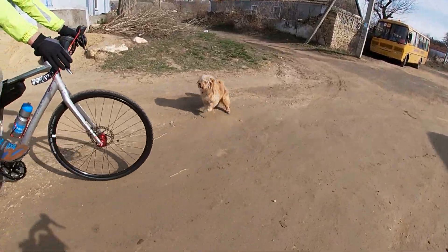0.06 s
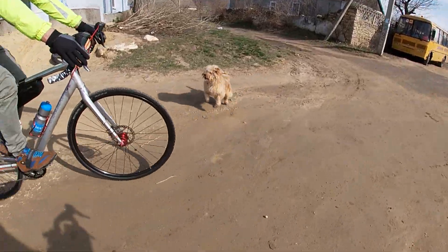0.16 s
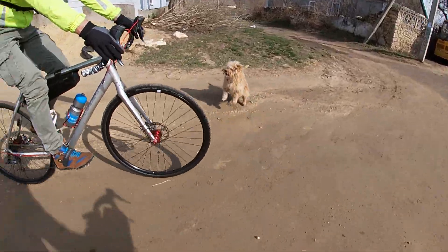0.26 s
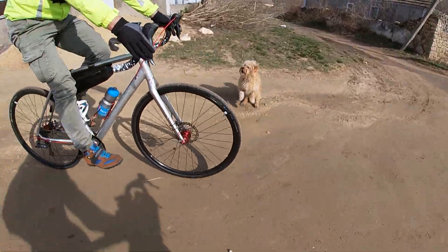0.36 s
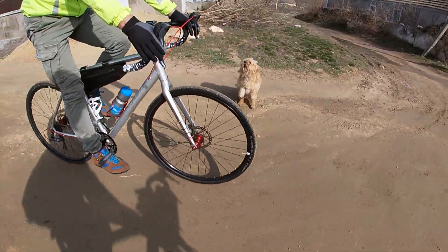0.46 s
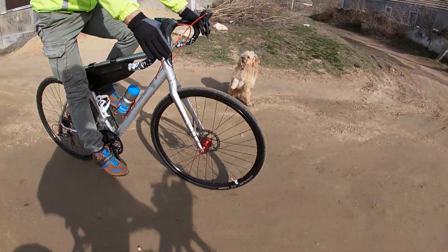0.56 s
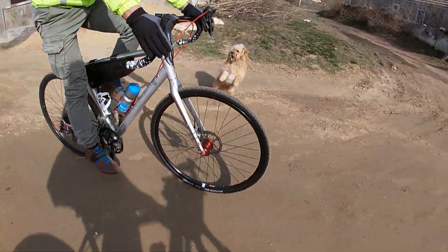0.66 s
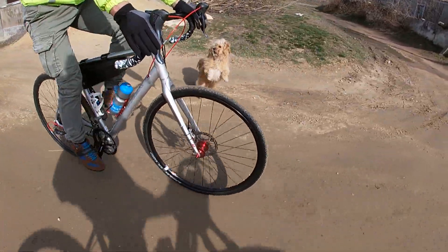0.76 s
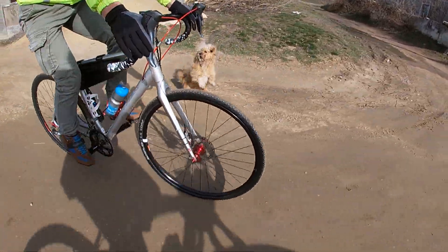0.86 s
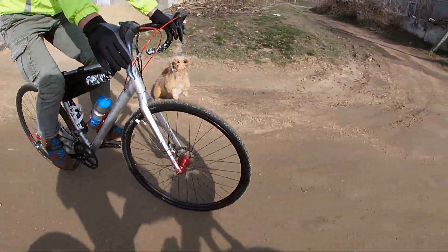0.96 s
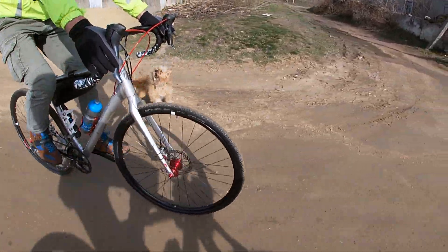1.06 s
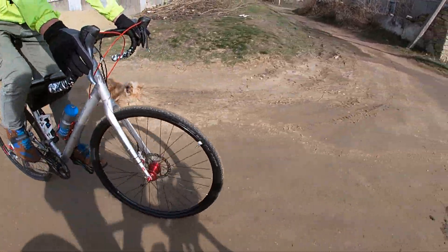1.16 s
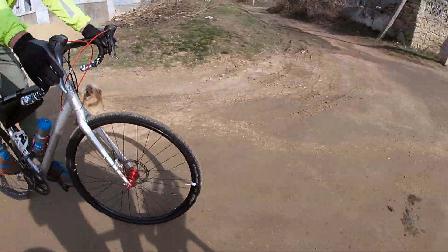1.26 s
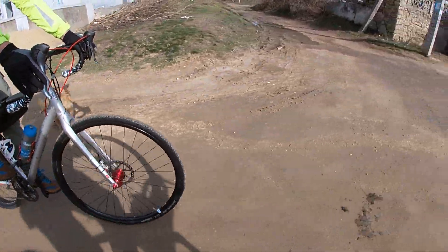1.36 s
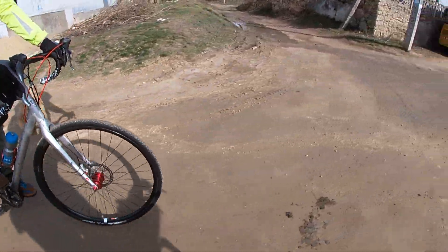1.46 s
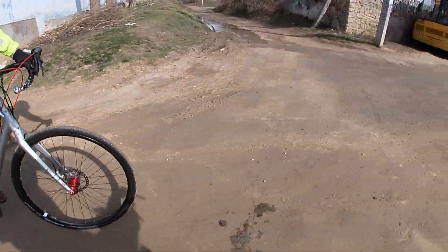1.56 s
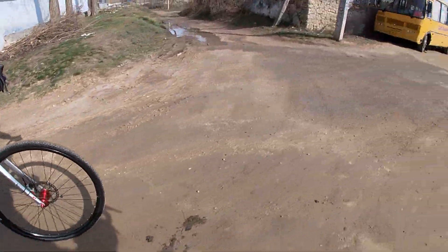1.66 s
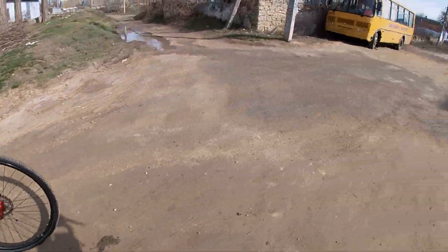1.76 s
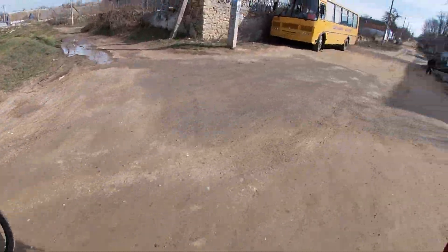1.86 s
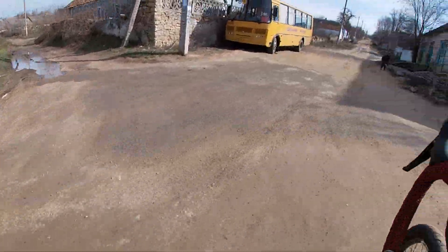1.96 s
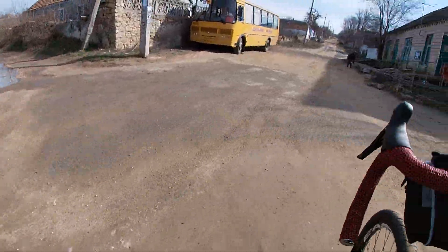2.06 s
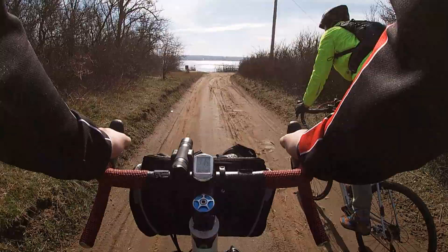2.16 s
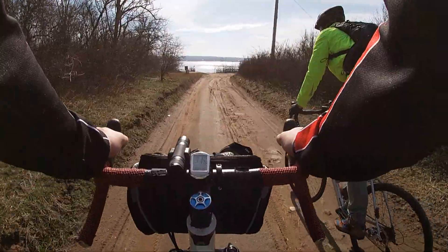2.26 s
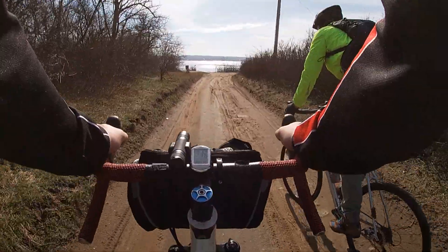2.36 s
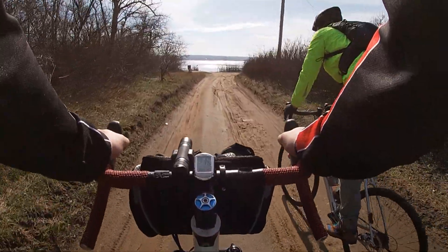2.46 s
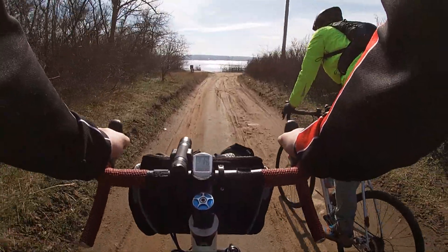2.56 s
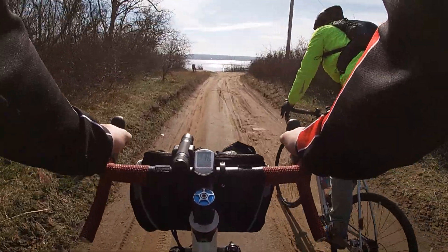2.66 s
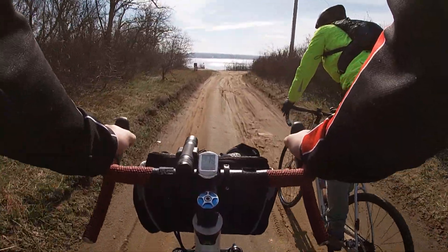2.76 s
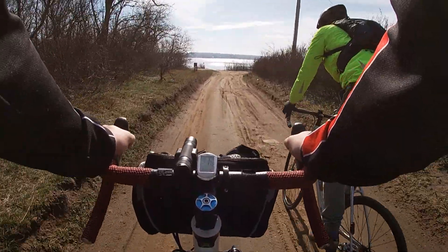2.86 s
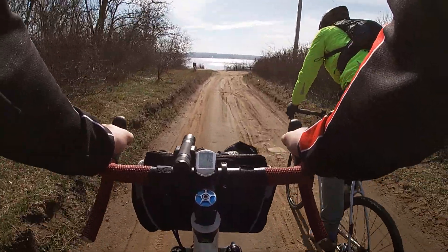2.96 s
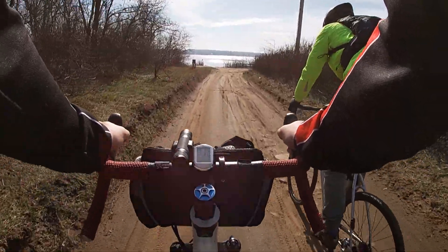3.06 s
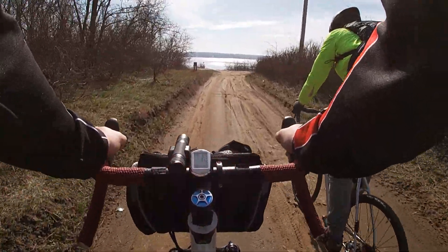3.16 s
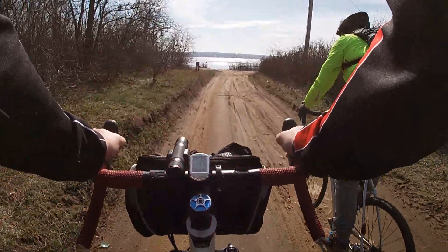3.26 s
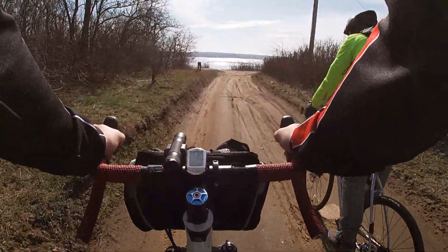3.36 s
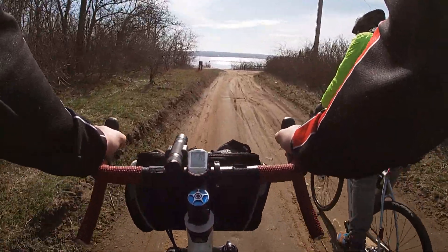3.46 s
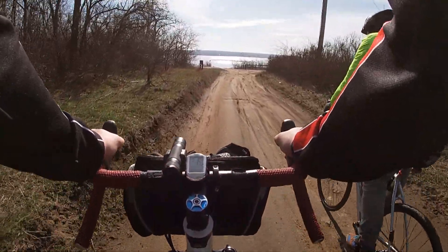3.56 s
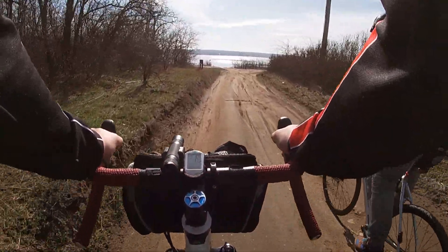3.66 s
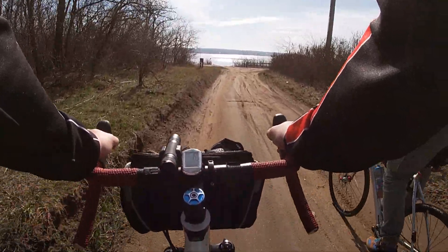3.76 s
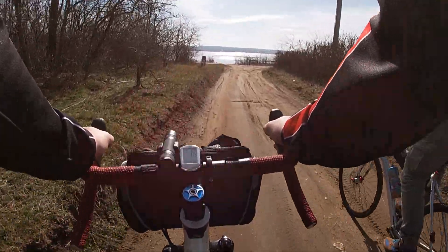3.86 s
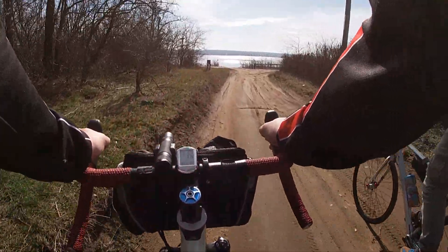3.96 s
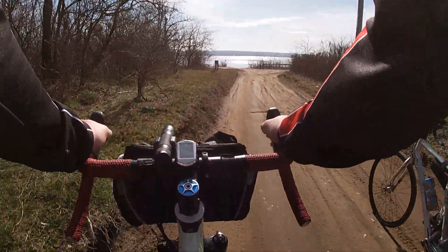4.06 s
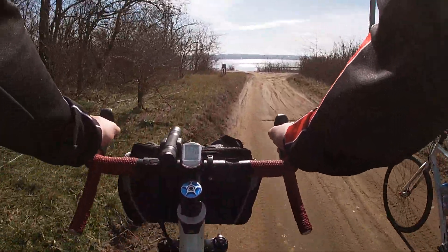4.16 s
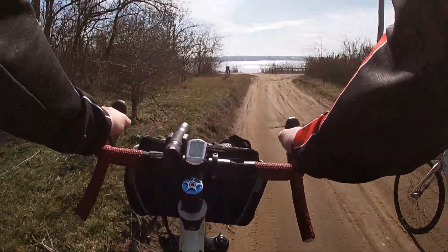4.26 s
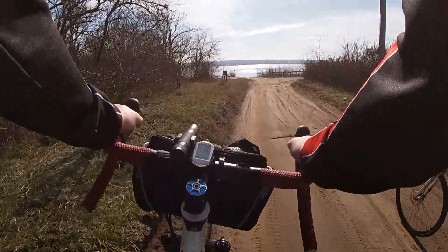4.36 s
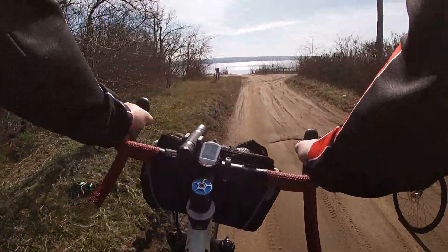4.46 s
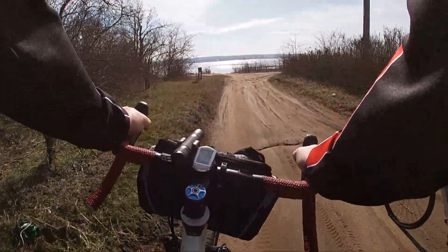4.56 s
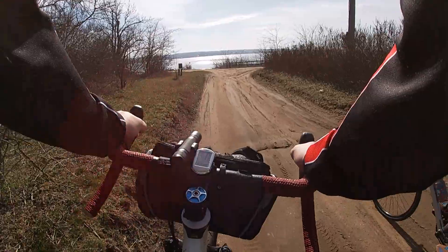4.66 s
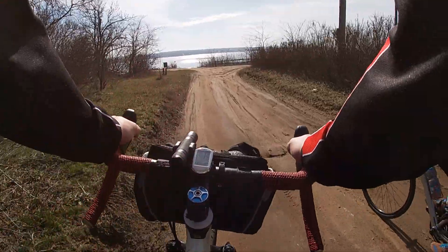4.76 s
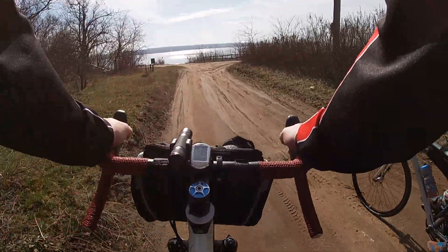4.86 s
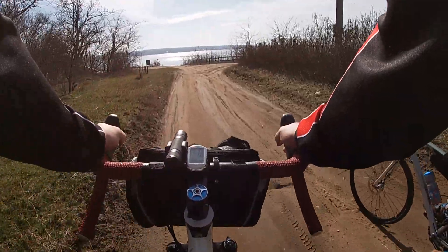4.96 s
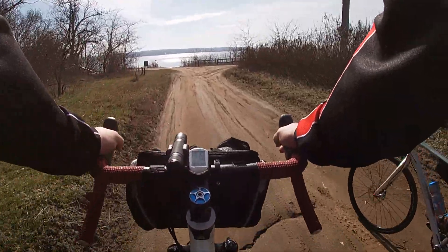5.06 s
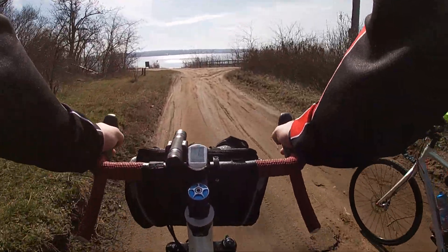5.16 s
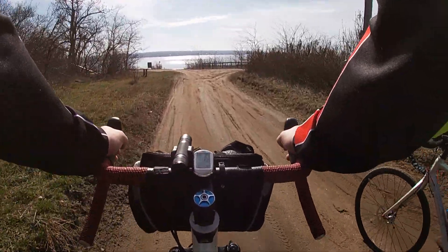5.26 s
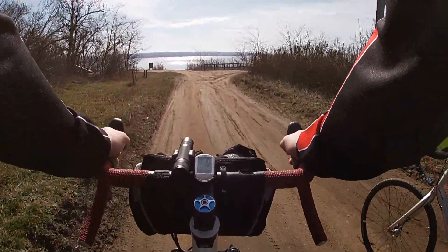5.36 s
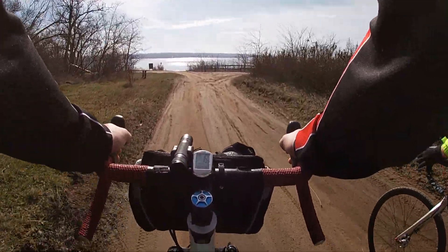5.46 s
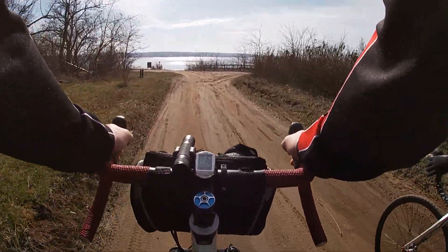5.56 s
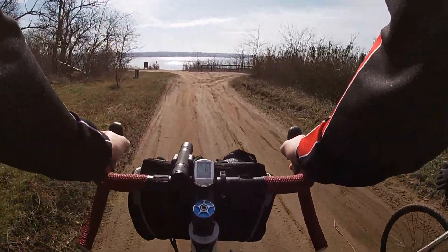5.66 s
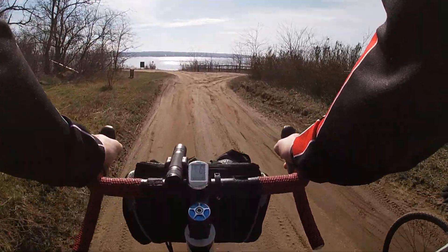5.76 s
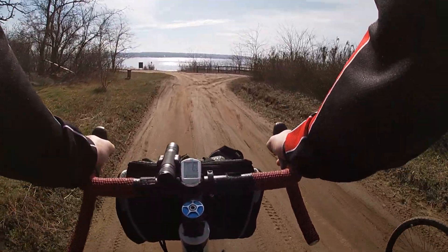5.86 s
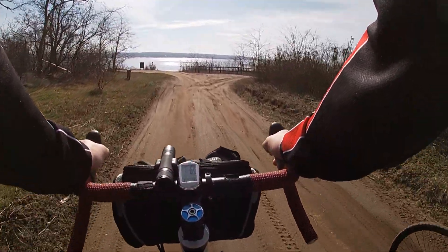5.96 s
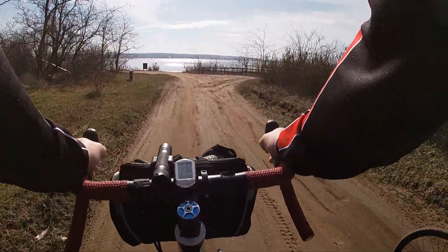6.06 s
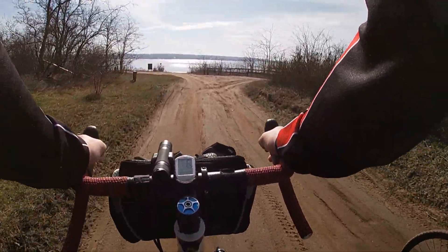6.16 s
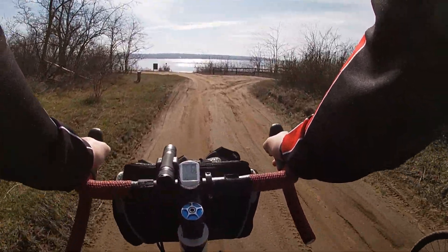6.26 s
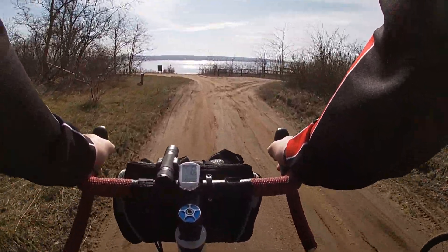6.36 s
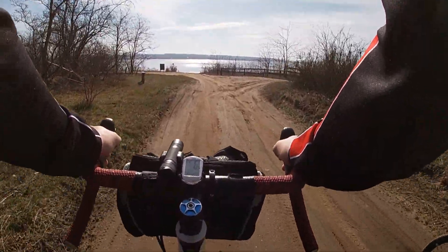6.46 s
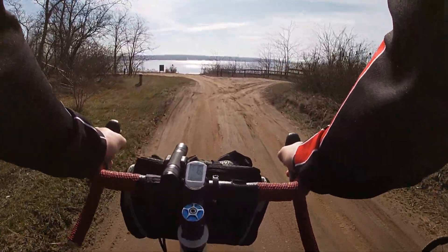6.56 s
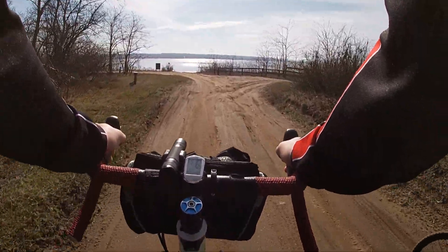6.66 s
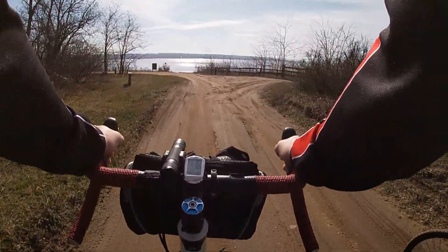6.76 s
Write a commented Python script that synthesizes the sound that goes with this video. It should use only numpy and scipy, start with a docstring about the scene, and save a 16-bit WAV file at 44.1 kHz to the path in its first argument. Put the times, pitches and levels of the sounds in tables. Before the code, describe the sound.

On a village street, a small dog yaps hoarsely at passing cyclists, one quick call and then a close pair, with a light scattered echo and a faint whimper at the end. After a short rolling lull, a sudden cut brings a coasting bicycle on rough dirt: fast freewheel ticking, humming tyres, grit crunch, frame thuds and sharp stone knocks, all under rumbling wind on a muffled, cased microphone.

```python
"""A small dog's low yap is heard first, already under way; three louder, hoarse yaps at a cyclist follow.
The place is a village street: one wall and a scattered tail throw back the voice, made of harmonics and rasp.
Then a bicycle coasts down a dirt track: pawls ping and ring the hub, tyres hum, grit hisses and clicks,
bumps thud through the frame. Wind noise buffets the microphone, whose sealed case dulls the treble."""
import sys
import numpy as np
from scipy import signal
from scipy.io import wavfile
from scipy.ndimage import uniform_filter1d

SR = 44100
rng = np.random.default_rng(int(sys.argv[2]) if len(sys.argv) > 2 else 0)


def put_to_file(sound):
    """Save the sound as 16-bit audio at rate SR, in the file named by the first command-line argument."""
    columns = np.atleast_2d(sound).T  # one column per channel
    safe = np.clip(columns, -1, 1)
    whole_steps = np.round(safe * 32767)
    wavfile.write(sys.argv[1], SR, whole_steps.astype(np.int16))


N = 300321  # length in samples

# wind on the microphone: start_s, buffeting_db
WIND_BUFFETING = [(0.0, -54), (0.42, -28), (0.72, -37.5), (1.01, -26), (1.99, -33.5), (2.1, -29),
                  (2.37, -36.5), (2.71, -27), (3.22, -35), (3.81, -23.5), (4.1, -32.5), (4.28, -24),
                  (4.74, -31), (4.8, -21.5), (5.63, -32.5), (6.05, -28), (6.64, -32.5), (6.81, -28)]
# roar over the buffeting, weak while the microphone is sheltered: start_s, level_db
ROAR_OVER_BUFFETING = [(0, 4.5), (.45, -7.5), (.75, -15), (1.99, -20), (2.1, -1.5), (4.6, -8),
                       (4.85, -11.5), (5.6, -5.5), (6.81, -2.5)]
# colour of the buffeting: frequency_hz, relative_db
BUFFET_SPECTRUM = [(10, -10.5), (30, 0.5), (105, -19), (170, -23.5)]
# colour of the roar: frequency_hz, relative_db
ROAR_SPECTRUM = [(70, -51.5), (130, 2), (250, -3), (400, -21)]
# fine hiss of the headwind on the track: frequency_hz, relative_db
HEADWIND_SPECTRUM = [(5000, -10), (7500, -6), (16000, -3)]
HEADWIND_DB = -45.5

# tyres on the street: start_s, hiss_db
STREET_ROLLING = [(0, -50), (.4, -42.5), (.8, -53.5), (1.95, -52.5), (2.195, -45)]
# colour of the street hiss: frequency_hz, relative_db
STREET_HISS_SPECTRUM = [(200, -26.5), (350, 9.5), (700, 4.5), (1400, 0.5), (2500, -6.5), (16000, -15.5)]
# roughness of the track under the tyres: start_s, hum_db
TRACK_ROUGHNESS = [(2.198, -45.5), (2.42, -42), (2.49, -32), (3.05, -38), (3.53, -35), (3.61, -25),
                   (3.68, -33.5), (4.52, -40.5), (5.87, -34.5), (6.81, -39)]
# colour of the tyre hum: frequency_hz, relative_db
HUM_SPECTRUM = [(200, -12), (300, 0), (410, 2.5), (600, -5), (900, -16.5), (1300, -53)]
# colour of the grit hiss: frequency_hz, relative_db
GRIT_SPECTRUM = [(400, -33), (800, 3.5), (1100, 1), (2800, 0.5), (3800, -3), (5000, -2.5), (16000, -8)]
GRIT_DB, GRIT_FOLLOWS, HUM_MEAN_DB = -40, 0.4, -39  # grit takes a share of the swings of the hum
SETTLE_S, GRIT_START_DB, HUB_START_DB = 0.69, -8, -7  # grit and freewheel start softer and settle
# breathy bands that grow as the other bicycle drops back beside the microphone: centre_hz, width_hz
BREATHY_BANDS = [(1420, 130), (2950, 170)]
BREATHY_DB, BREATHY_GROWTH_DB, BREATHY_AT_S, BREATHY_TAKES_S = -61, 13, 5.2, 0.18

# wheel speed: start_s, freewheel_ticks_per_s
TICK_RATE = [(2.2, 47.66), (2.7, 47.13), (3.15, 49.77), (3.45, 49.28), (3.9, 51.08), (4.13, 54.23),
             (4.4, 53.92), (4.62, 48.94), (5.35, 52.95), (5.62, 51.1), (5.85, 47.56), (6.08, 47.57),
             (6.3, 44.03), (6.81, 43.62)]
# hub and spokes ringing at each tick: pitch_hz, t60_s, relative_db
HUB_RINGS = [(2840, 0.0048, -6.5), (8930, 0.0065, -2), (10400, 0.0065, -4), (12000, .006, -15)]
PAWL_HZ, PAWL_DB = 4880, 7.5  # clear ping of each pawl, before its chance detuning; level in the tick
HUB_DB, HUB_FADE_DB, HUB_FADE_S = -43.5, -4.5, 5.3  # ticking sinks back late in the descent

# clicks and crunches of grit and bicycle parts: start_s, level_db, centre_hz
GRIT_CLICKS = [(0.312, -36.5, 2780), (.445, -40, 3950), (.948, -45, 5100), (0.959, -46, 5000),
               (1.546, -31, 2720), (1.753, -46, 3980), (2.005, -36.5, 3080), (2.021, -39, 4000),
               (2.115, -37.5, 3800), (2.46, -35, 1590), (2.719, -33, 1600), (3.575, -28.5, 1300),
               (4.008, -31.5, 4500)]
# sharp knocks of stones on the frame: start_s, snap_db, ring_db, ring_hz, t60_s
STONE_KNOCKS = [(4.965, -28, -35, 1960, .04), (5.886, -20, -28.5, 1185, 0.042),
                (6.318, -12, -28, 1350, 0.027)]
# bumps and puffs heard as low thuds: start_s, level_db, pitch_hz
LOW_THUDS = [(2.474, -16.5, 372), (2.577, -14.5, 402), (2.599, -12.5, 388), (2.794, -19, 149),
             (2.834, -16.5, 385), (3.319, -20, 192), (3.518, -16.5, 176), (3.692, -23, 150),
             (3.844, -10, 185), (4.421, -18, 179), (6.712, -19.5, 202)]

# yaps: start_s, jump_after_s, jump_takes_s, sag_after_s, sag (shares of top pitch per s), length_s,
# top_pitch_hz, rasp_flare_after_s, flare_db, then levels at the top pitch: first_db, second_db, third_db
# (harmonics), rasp_db, upper_harmonics_db, half_tones_db; pitch_rounding_s, throat_pitch (factor)
YAP_CALLS = [(-.1, 0.024, 0.013, .145, 13, 0.17, 405.2, 0.11, 4, -24.5, -27, -24.5, -50.5, -51, -37.5, 0.014, 1.28),
             (0.453, 0.052, .012, 0.13, 8.1, 0.17, 683, 0.06, 11.5, -10.5, -24.5, -29.5, -44, -60.5, -60.5, 0.0064, 1.02),
             (1.068, .066, .012, .141, 12, 0.17, 685.4, 0.064, 7, -11.5, -26, -47.5, -43, -62.5, -62.5, 0.011, .99),
             (1.35, .057, .024, .117, 13, 0.18, 716, 0.02, 8, -14, -30, -33.5, -43.5, -58.5, -64, 0.0061, .97)]
LOW_PITCH = .7  # share of the top pitch from which a yap jumps up in an S-curve
SAG_KNEE_S, FLARE_WIDTH_S = 0.00594, 0.032  # roundness of the turn from hold to sag; width of the rasp flare
# first, second, third harmonic, rasp, upper harmonics: dB times the squared shortfall of pitch
LOW_DB, SAG_DB = (-200, -230, -380, -24, -300), (-210, -18, -52.5, -18, 17)  # before the jump; in the sag
RELEASE_DB, RELEASE_S = -11, 0.014  # the voice dies out at the end
ONSET_DB, ONSET_S, RASP_ONSET_S = -19, 0.013, 0.0093  # voice and rasp swell in from this far down
# hoarse second vibration, in bursts around the loud yaps and a faint whimper after the last:
# start_s, length_s, first_hz, last_hz, loudest_after_s, level_db, first_roughness (0-1)
HOARSE_BURSTS = [(0.451, 0.072, 579, 915, 0.039, -12, 0.16), (1.067, 0.093, 616, 856, 0.052, -15, 0.14),
                 (1.329, 0.048, 658, 794, 0.048, -19, 0.56), (1.376, 0.066, 758, 892, 0.021, -17, 0.4),
                 (1.614, 0.043, 566, 540, 0.015, -35, 0)]
HOARSE_START_DB, HOARSE_END_DB = -7.5, -18.5  # level at either end, under the loudest
# torn bands above the hoarse tone: pitch (times the tone), relative_db
TORN_BANDS = [(1.4, -7.5), (2.001, -24), (2.7, -22.5)]
# voiceless huffs of the dog: start_s, length_s, upper_rasp_db
DOG_HUFFS = [(0.1, 0.089, -43.5), (0.644, 0.08, -48), (0.766, 0.062, -49.5)]
# throat resonances: centre_hz, width_hz, relative_db
THROAT_RESONANCES = [(1080, 450, 7.5), (2130, 260, 9), (2580, 420, 1), (3550, 280, 0), (4750, 240, -3.5),
                     (5600, 230, -4), (6150, 200, -7), (8200, 3100, -6)]
# echoes from walls: delay_s, relative_db
WALL_ECHOES = [(0.169, -38)]
STREET_DB, STREET_T60 = -20.5, 0.74  # scattered tail: level in dB, decay by 60 dB in s

# treble loss and peaks of the sealed case: frequency_hz, gain_db
CASE_RESPONSE = [(5600, -0.5), (6200, -5.5), (6900, -19.5), (8500, -22), (9250, -18.5), (11000, -27.5),
                 (12100, -23.5), (15500, -29.5)]
EDGE_HZ = 15600  # band limit


def amp(db):
    """Turns dB into gain."""
    return 10 ** (np.asarray(db) / 20)


def evened(x):
    """Scales to rms 1."""
    return x / np.sqrt(np.mean(x ** 2) + 1e-20)


def read(points, hz):
    """Reads a spectrum on a log-frequency axis."""
    f, value = np.transpose(points)
    return np.interp(np.log(hz + 1), np.log(f + 1), value)


def played(rows):
    """Start time and the columns of a curve at every sample."""
    s, *columns = np.transpose(rows)
    t = np.arange(s[0], s[-1], 1 / SR)
    return s[0], [np.interp(t, s, c) for c in columns]


def add(mix, s, sound):
    """Mixes a sound in at time s; what lies before zero is dropped."""
    at = round(s * SR)
    part = mix[max(at, 0):][:len(sound) + min(at, 0)]
    part += sound[max(-at, 0):][:len(part)]


def wander(size, smooth):
    """Slow chance of rms about 1, smoothed over some samples."""
    return uniform_filter1d(rng.standard_normal(size), size=smooth) * np.sqrt(smooth)


def step(t, at, takes):
    """S-curve from 0 to 1."""
    return 1 / (1 + np.exp(-(t - at) / takes))


def resonate(x, hz, width):
    """Shifts the curve hz down to zero, smooths, and shifts back: a resonance of gain 1."""
    turn = np.exp(2j * np.pi * np.cumsum(hz * np.ones(len(x))) / SR)
    r = np.exp(-np.pi * width / SR)
    return 2 * (turn * signal.lfilter([1 - r], [1, -r], x / turn)).real


def noise(spectrum, size, patchy_db, lumpy_db):
    """Random short-time spectra with drifting patches and lumps shared by all pitches."""
    frames, hz = 4 * N // size + 5, np.fft.rfftfreq(size, 1 / SR)
    a, b, patches = rng.standard_normal((frames, len(hz), 3)).T
    patches = uniform_filter1d(patches, size=8, axis=0)
    patches = evened(uniform_filter1d(patches, size=8, axis=1))
    lumps = evened(uniform_filter1d(rng.standard_normal(frames), size=3))
    db = read(spectrum, hz)[:, None] + patchy_db * patches + lumpy_db * lumps
    db[(hz < spectrum[0][0]) | (hz > spectrum[-1][0])] = -100
    sound = signal.istft((a + 1j * b) * amp(db), nperseg=size, noverlap=3 * size // 4)[1]
    return evened(sound[:N])


def wind():
    """Turbulence on the microphone: lumpy low buffeting under a rougher roar."""
    out = np.zeros(N)
    s, (buffet_db,) = played(WIND_BUFFETING)
    size = len(buffet_db)
    roar_db = buffet_db + played(ROAR_OVER_BUFFETING)[1][0][:size]
    buffeting = noise(BUFFET_SPECTRUM, size=2048, patchy_db=0.5, lumpy_db=1.0)[:size]
    roar = noise(ROAR_SPECTRUM, size=1024, patchy_db=1.5, lumpy_db=3.5)[:size]
    add(out, s, amp(buffet_db) * buffeting)
    add(out, s, amp(roar_db) * roar)
    return out


def freewheel():
    """Pawls snap over the teeth in step with the wheel; each snap pings, and its chatter rings the hub."""
    teeth = np.cumsum(played(TICK_RATE)[1][0]) / SR + .74
    t, phase = np.arange(len(teeth)) / SR, teeth % 1
    # every tooth has its own strength and tuning
    chances = rng.standard_normal((int(teeth[-1]) + 1, 2))
    strength, tune = chances[teeth.astype(int)].T
    snap = amp(2.0 * strength) * phase * np.exp(-phase / .075)
    chatter = snap * rng.choice([-1., 1.], len(teeth))
    ping_hz = PAWL_HZ * (1 + .04 * tune + .05 * wander(len(t), smooth=40))
    ping = snap * np.sin(2 * np.pi * np.cumsum(ping_hz) / SR)
    ring = sum(amp(db) * evened(resonate(chatter, hz * (1 + .035 * tune), 2.2 / t60))
               for hz, t60, db in HUB_RINGS)
    start_db = HUB_START_DB * np.exp(-t / SETTLE_S)
    fade_db = HUB_FADE_DB * step(t + TICK_RATE[0][0], HUB_FADE_S, 0.36)
    ticks = evened(ring + amp(PAWL_DB) * evened(ping) + 2.3 * evened(chatter))
    return amp(HUB_DB + start_db + fade_db) * ticks


def rolling():
    """Tyre noise hisses on the street; on the track it hums and crunches grit under headwind and freewheel."""
    out = np.zeros(N)
    s, (hiss_db,) = played(STREET_ROLLING)
    hiss = noise(STREET_HISS_SPECTRUM, size=512, patchy_db=2.2, lumpy_db=0.5)
    add(out, s, amp(hiss_db) * hiss[:len(hiss_db)])

    s, (hum_db,) = played(TRACK_ROUGHNESS)
    size = len(hum_db)
    t = s + np.arange(size) / SR
    grit_db = GRIT_DB + GRIT_FOLLOWS * (hum_db - HUM_MEAN_DB) + GRIT_START_DB * np.exp(-(t - s) / SETTLE_S)
    hum = noise(HUM_SPECTRUM, size=512, patchy_db=2.5, lumpy_db=1.0)[:size]
    grit = noise(GRIT_SPECTRUM, size=256, patchy_db=2.5, lumpy_db=1.0)[:size]
    add(out, s, amp(hum_db) * hum)
    add(out, s, amp(grit_db) * grit)

    breathy_db = BREATHY_DB + BREATHY_GROWTH_DB * step(t, BREATHY_AT_S, BREATHY_TAKES_S)
    air = rng.standard_normal(size) * amp(0.47 * wander(size, smooth=1500))
    breath = evened(sum(resonate(air, hz, width) for hz, width in BREATHY_BANDS))
    add(out, s, amp(breathy_db) * breath)
    headwind = noise(HEADWIND_SPECTRUM, size=256, patchy_db=1.1, lumpy_db=7.0)[:size]
    add(out, s, amp(HEADWIND_DB) * headwind)
    add(out, TICK_RATE[0][0], freewheel())
    return out


def knocks():
    """Clicks are dying bursts of noise with a centre; stones snap and ring the frame; thuds are a few low cycles."""
    out, t = np.zeros(N), np.arange(SR // 5) / SR
    for s, db, hz in GRIT_CLICKS:
        air = rng.standard_normal(len(t))
        burst = 0.45 * evened(resonate(air, hz, 550.0)) + 1.2 * air
        add(out, s, amp(db - 60 * t / 0.069) * np.minimum(t / 0.0024, 1) * burst)
    for s, snap_db, ring_db, hz, t60 in STONE_KNOCKS:
        snap = amp(snap_db) * (1 - t / 0.00011) * np.exp(-t / 0.00014)
        scrape = amp(snap_db - 10 - 60 * t / 0.011) * rng.standard_normal(len(t))
        ring = amp(ring_db - 60 * t / t60) * np.sin(2 * np.pi * hz * t)
        add(out, s, snap + scrape + ring)
    for s, db, hz in LOW_THUDS:
        cycles = hz * t
        swell = cycles / 1.88 * np.exp(1 - cycles / 1.19)
        add(out, s, amp(db) * swell * np.sin(2 * np.pi * cycles))
    return out


def throat(x, mouth=1):
    """Air noise through the throat resonances, each applied twice for dark valleys; the upper ones have rms 1."""
    bands = []
    for hz, width, db in THROAT_RESONANCES:
        # each resonance catches the torn air stream in its own fits and starts
        fits_db = 3.1 * wander(len(x), smooth=500)
        band = resonate(resonate(x, hz * mouth, width), hz * mouth, width)
        bands.append(amp(db + fits_db) * band)
    return sum(bands) / np.std(sum(bands[3:]))


def yap_shape(jump, takes, sag, sag_per_s, length, top_hz, flare, flare_db, *levels_db):
    """Pitch jumps, holds and sags; layer levels change as the pitch falls short of the top."""
    t = np.arange(0, length, 1 / SR)
    low = (1 - LOW_PITCH) * (1 - step(t, jump, takes))
    sunk = sag_per_s * SAG_KNEE_S * np.logaddexp(0, (t - sag) / SAG_KNEE_S)
    onsets = [ONSET_S] * 3 + [RASP_ONSET_S, ONSET_S]
    end_db = RELEASE_DB * np.exp((t - length) / RELEASE_S)
    first, second, third, rasp, upper = (
        db + a * low ** 2 + b * sunk ** 2 + ONSET_DB * np.exp(-t / onset) + end_db
        for db, a, b, onset in zip(levels_db, LOW_DB, SAG_DB, onsets))
    rasp = rasp + flare_db * np.exp(-((t - flare) / FLARE_WIDTH_S) ** 2)
    return top_hz * np.maximum(1 - low - sunk, .25), first, second, third, rasp, upper


def yap(s, *row):
    """Harmonics on a pitch arch, the high ones lit by the throat, uneven half tones, a rasp puffed each cycle."""
    *shape, half_db, round_s, mouth = row
    hz, first_db, second_db, third_db, rasp_db, upper_db = yap_shape(*shape)
    hz = uniform_filter1d(hz, size=round(round_s * SR), mode="nearest")
    size = len(hz)
    turns = np.cumsum(hz * (1 + .005 * wander(size, smooth=150))) / SR
    # the jaw opens with the pitch and trembles, which moves the resonances
    jaw = mouth * (hz / hz.max()) ** .08 * (1 + .02 * wander(size, smooth=600))

    def lit(f):
        """Gain of the throat resonances, all but the broadest, at a frequency."""
        return sum(amp(db) / (1 + (2 * (f - top * jaw) / width) ** 2) ** .5
                   for top, width, db in THROAT_RESONANCES[:-1])

    orders = np.arange(1, 9)
    gains = [amp(first_db), amp(second_db), amp(third_db)]
    gains += [amp(upper_db) * lit(k * hz) for k in orders[3:]]
    voice = np.zeros(size)
    for k, gain in zip(orders, gains):
        shimmer = 1 + 0.17 * (k - .8) * wander(size, smooth=200)
        voice += gain * shimmer * np.sin(2 * np.pi * k * turns)
    # uneven cycles sound halfway between the harmonics
    half_gain = amp(half_db + first_db - first_db.max()) * wander(size, smooth=500)
    halves = half_gain * sum(np.sin(2 * np.pi * (k - .5) * turns) for k in orders[:4])
    puffs = (0.19 + np.exp(-(turns % 1) / 0.12)) * rng.standard_normal(size)
    rasp = amp(rasp_db) * throat(puffs, jaw)
    return s, (np.sqrt(2) * (voice + halves) + rasp) * signal.windows.tukey(size, .05)


def hoarse(s, length, first_hz, last_hz, loudest, level_db, first_rough):
    """A tone that breaks up more and more into noise round the same pitch."""
    t = np.arange(0, length, 1 / SR)
    hz = first_hz + (last_hz - first_hz) * t / length
    db = level_db + np.interp(t, [0, loudest, length], [HOARSE_START_DB, 0, HOARSE_END_DB])
    rough = np.clip(np.linspace(first_rough, .8, len(hz)), 0, 1)
    air = rng.standard_normal(len(hz))
    turns = np.cumsum(hz) / SR
    tone = np.sqrt(2) * np.sin(2 * np.pi * turns) + 0.081 * np.sin(4 * np.pi * turns)
    fuzz = evened(resonate(resonate(air, hz, 200.), hz, 200.))
    torn = sum(amp(up_db) * evened(resonate(resonate(air, k * hz, 260.), k * hz, 260.))
               for k, up_db in TORN_BANDS)
    voice = np.sqrt(1 - rough) * tone + np.sqrt(rough) * (fuzz + torn)
    return s, amp(db) * voice * signal.windows.tukey(len(hz), .25)


def street_echo(dry):
    """Adds the wall echo and the scattered tail of the street over two sets of random paths."""
    t = np.arange(SR) / SR
    taps = rng.choice([-1., 1.], (2, SR)) * (rng.random((2, SR)) < .05)
    tail = taps * amp(-60 * t / STREET_T60) * np.minimum(t / .03, 1)
    # a rough wall smears its echo over some milliseconds
    smears = sum(amp(db) * np.exp(-((t - s) / .006) ** 2) for s, db in WALL_ECHOES)
    echoes = taps * smears / 4
    paths = amp(STREET_DB) * tail / np.linalg.norm(tail[0]) + echoes
    wet = signal.fftconvolve(dry[None], paths, axes=1)[:, :N]
    # the listener moves, so two sets of paths keep trading places and the tail breaks up
    angle = 1.8 * wander(N, smooth=600)
    return dry + wet[0] * np.cos(angle) + wet[1] * np.sin(angle)


def dog():
    """Voiced yaps, hoarse bursts and voiceless huffs of breath, thrown back by the street."""
    voice = np.zeros(N)
    for row in YAP_CALLS:
        add(voice, *yap(*row))
    for row in HOARSE_BURSTS:
        add(voice, *hoarse(*row))
    for s, length, db in DOG_HUFFS:
        size = round(length * SR)
        add(voice, s, amp(db) * np.hanning(size) * throat(rng.standard_normal(size)))
    return street_echo(voice)


def scene():
    """All sources at one microphone."""
    return (wind() + rolling() + knocks() + dog())[None]


def record(dry):
    """The microphone's sealed case colours the sound, then the band limit cuts the top."""
    hz = np.linspace(0, SR / 2, 513)
    case = signal.firwin2(511, hz, amp(read(CASE_RESPONSE, hz)), fs=SR)
    cased = signal.oaconvolve(dry, case[None], "same")
    band = signal.firwin(511, EDGE_HZ, window=("kaiser", 9), fs=SR)
    return signal.oaconvolve(cased, band[None], "same")


dry = scene()
out = record(dry)
put_to_file(out)
```